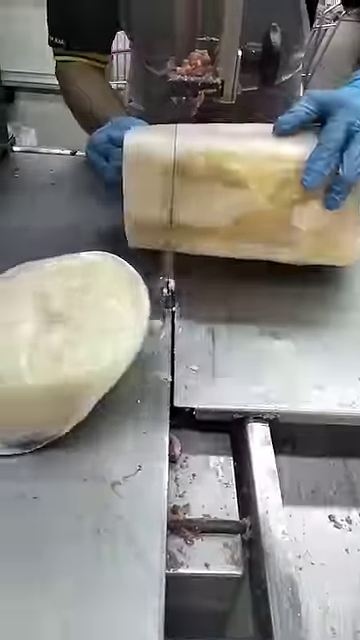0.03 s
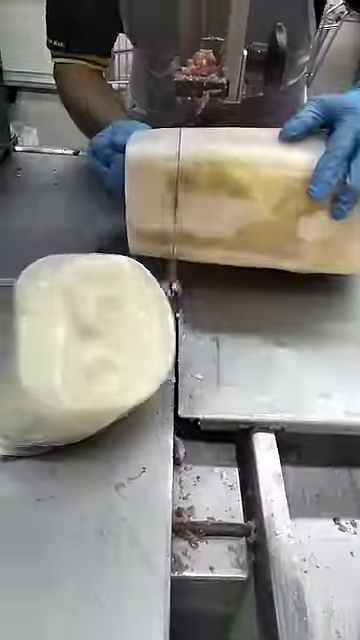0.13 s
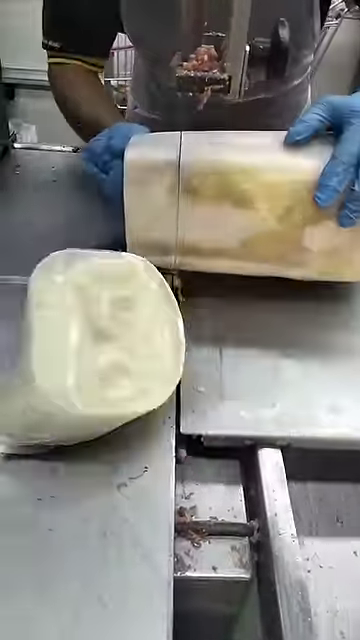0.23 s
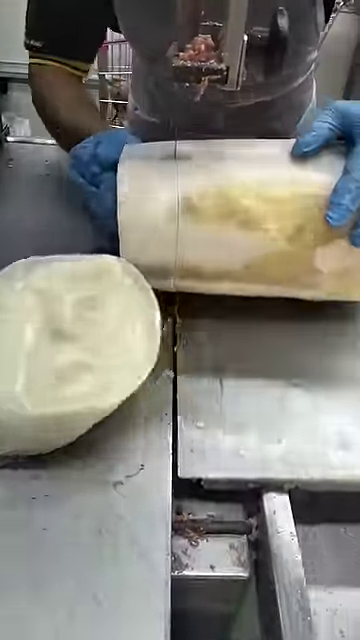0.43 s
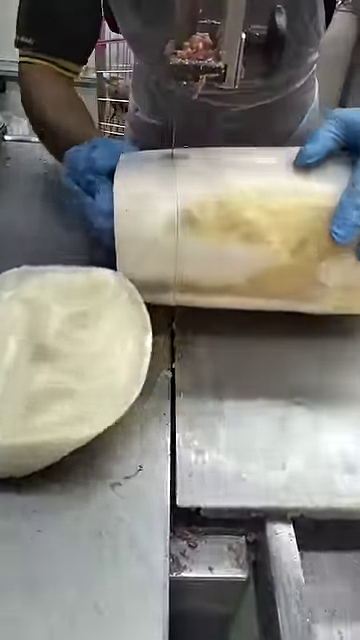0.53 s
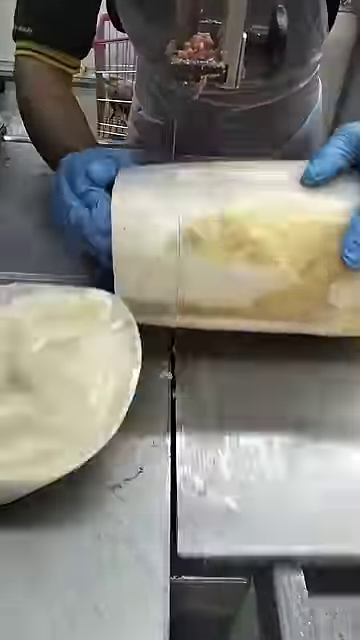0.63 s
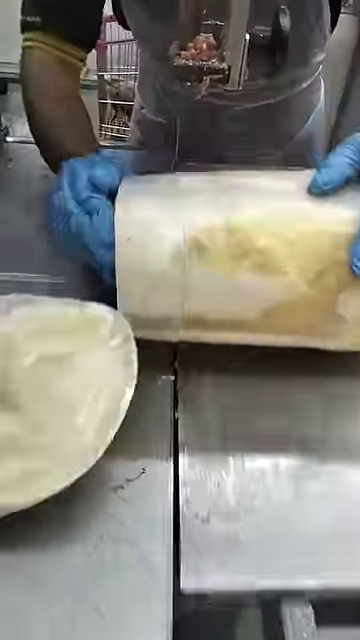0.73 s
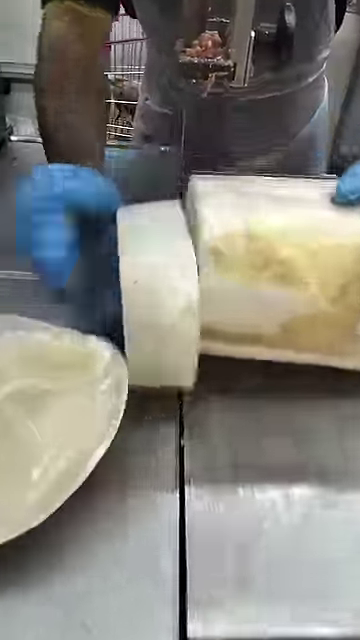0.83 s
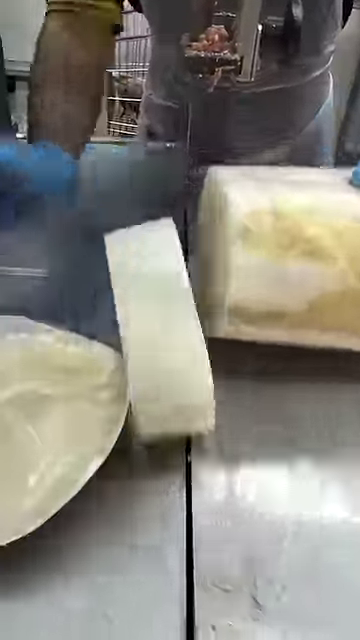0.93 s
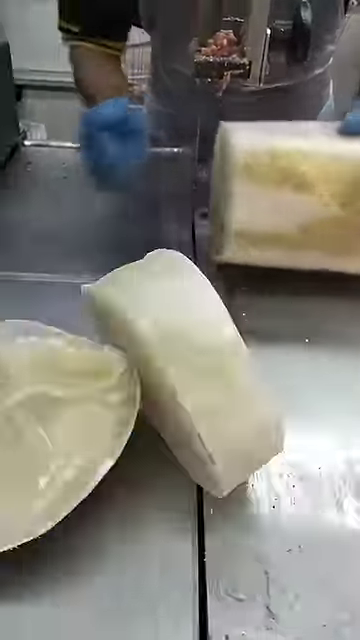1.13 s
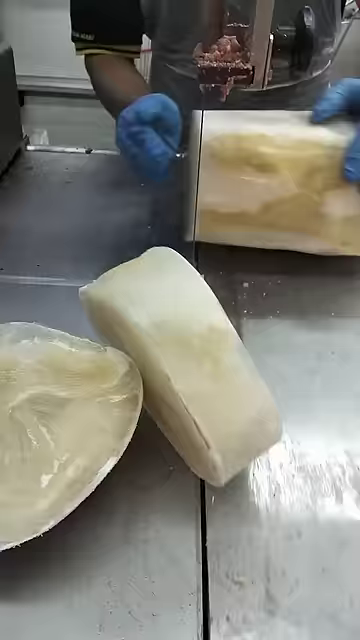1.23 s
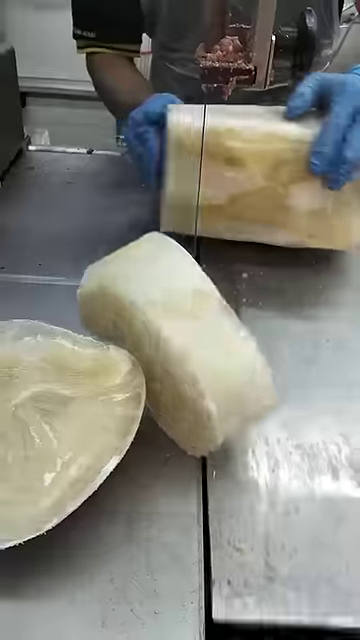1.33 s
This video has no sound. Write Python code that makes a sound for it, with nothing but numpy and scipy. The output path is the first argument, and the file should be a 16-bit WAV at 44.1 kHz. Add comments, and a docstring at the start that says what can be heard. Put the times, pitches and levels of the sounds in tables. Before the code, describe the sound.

A band saw cuts a frozen block with a harsh, rasping squeal over machine hum.

```python
"""A band saw hums and whines in a workshop; then a frozen block is pushed through it near the microphone.
Tiny fractures at the teeth make a hiss and a rasp, and the blade, in forced vibration, buzzes and
squeals on harmonics of the tooth rate. The ice cracks and flung chips pelt the microphone.
The slice comes free and nudges the steel table while the blade whines on over the motor."""
import sys
import numpy as np
from scipy import signal
from scipy.fft import rfft, irfft, next_fast_len
from scipy.io import wavfile

SR = 44100
rng = np.random.default_rng(int(sys.argv[2]) if len(sys.argv) > 2 else 0)


def log_audio(samples):
    """Write samples as a 16-bit WAV file to the path given in sys.argv[1]."""
    # one column per channel
    frames = np.atleast_2d(samples).T
    # limit to full scale, then quantise
    limited = np.clip(frames, -1, 1)
    pcm = np.round(limited * 32767).astype(np.int16)
    wavfile.write(sys.argv[1], SR, pcm)


N = 61739
TIME = np.arange(N) / SR


def undb(db):
    """Decibels to amplitude ratio."""
    return 10 ** (np.asarray(db) / 20)


def unit(x):
    """Normalisation to rms 1."""
    return x / np.sqrt(np.mean(x ** 2))


def curve(rows):
    """Linear interpolation of (time [s], value) points."""
    return np.interp(TIME, *np.array(rows).T)


def swell(rows, fade_s=0.025):
    """Amplitude envelope through (time [s], level [dB]) points, fading out beyond both ends."""
    inside_s = np.minimum(TIME - rows[0][0], rows[-1][0] - TIME)
    return undb(curve(rows)) * np.clip(1 + inside_s / fade_s, 0, 1) ** 2


def wander(hz):
    """Random fluctuation: noise of rms 1, low-passed at hz."""
    f = np.arange(N // 2 + 1) * SR / N
    return unit(irfft(rfft(rng.standard_normal(N)) / (1 + (f / hz) ** 2), N))


def colour(x, spectrum):
    """Minimum-phase filtering through (frequency [Hz], level [dB]) points, scaled to rms 1."""
    size = 2 * next_fast_len(N)
    hz, db = np.array(spectrum).T
    f = np.arange(size // 2 + 1) * SR / size
    gain = undb(np.interp(np.log(f + 1), np.log(hz), db))
    cepstrum = irfft(np.log(gain))
    cepstrum[1:size // 2] *= 2
    cepstrum[size // 2 + 1:] = 0
    return unit(irfft(rfft(x, size) * np.exp(rfft(cepstrum)))[:N])


def clicks(per_s, spread_db):
    """Shot noise: independent impulses of uneven size."""
    struck = rng.random(N) < per_s / SR
    size = undb(spread_db * np.clip(rng.standard_normal(N), -2, 2))
    return struck * size * np.sign(rng.standard_normal(N))


def wavering_phase(hz, jitter, jitter_hz):
    """Frequency modulation: the phase of a rate that wavers by the rms fraction jitter."""
    return 2 * np.pi * np.cumsum(hz * (1 + jitter * wander(jitter_hz))) / SR


def rough_line(phase, width_hz):
    """Narrow-band noise: a partial of random amplitude and phase."""
    return wander(width_hz) * np.cos(phase) + wander(width_hz) * np.sin(phase)


def rough_tone(phase, partials, width_hz):
    """Superposition of noise bands on the harmonics of one rate, at rms 1."""
    return unit(sum(undb(db) * rough_line(k * phase, width_hz) for k, db in partials))


def locked_tone(phase, partials, flutter_db=1.3):
    """Phase-locked harmonics at rms 1; flutter grows with the root of the harmonic number."""
    tone = 0
    for k, db in partials:
        gain = undb(db + flutter_db * np.sqrt(k) * wander(65))
        tone += gain * np.sin(k * phase + 2 * np.pi * rng.random())
    return unit(tone)


# Motor tones (frequency [Hz], level [dB])
HUM_TONES = [(97, -51), (140, -51), (183, -52), (237, -52), (1168, -84), (1367, -60)]
# Machine rumble (frequency [Hz], relative spectral density [dB])
RUMBLE_SPECTRUM = [(20, -30), (50, 2), (80, -3), (150, -5.5), (210, -9.5), (280, -3.5), (420, -15.5),
                   (1300, -22.5), (4000, -18.5), (15000, -48)]
def motor():
    """Machine vibration: a line spectrum of hum over a continuous spectrum of rumble."""
    hum = sum(undb(db) * rough_line(2 * np.pi * hz * TIME, width_hz=6.3) for hz, db in HUM_TONES)
    return hum + undb(-45) * colour(rng.standard_normal(N), RUMBLE_SPECTRUM)


# Partials of the free blade (harmonic number, relative level [dB])
WHINE_PARTIALS = [(1, -11.5), (2, 0.5), (3, -5.5), (4, -3), (5, -11), (6, -7), (7, -14), (9, -14),
                  (10, -13), (12, -10.5), (14, -11)]
# The whine swells as the block comes near (time [s], relative level [dB])
WHINE_ENVELOPE = [(0, 1.5), (.16, 10.5), (.24, 4), (.8, -5), (.92, -5.5), (1.1, -1), (1.4, -18)]
def whine(tooth_hz=958.6, width_hz=6.5):
    """Periodic excitation: the free blade sounds harmonics of its tooth rate."""
    phase = wavering_phase(tooth_hz, jitter=0.0018, jitter_hz=6.5)
    tone = unit(sum(undb(db) * rough_line(k * phase, width_hz * k) for k, db in WHINE_PARTIALS))
    return undb(-46.5 + curve(WHINE_ENVELOPE)) * tone


# Friction in the guides (frequency [Hz], relative spectral density [dB])
GUIDE_SPECTRUM = [(350, -6.5), (550, -3), (750, -3.5), (1300, -1), (1800, -3.5), (2080, -8.5), (2450, -2.5),
                  (3050, -10), (3450, -9), (4150, 0), (4450, -4), (5100, -17.5), (5900, -8), (7400, -19),
                  (8600, -12), (9400, -14), (10000, -21), (10900, -21), (11600, -17.5), (13300, -16),
                  (14000, -21), (15200, -18.5)]
# Its strength (time [s], relative level [dB])
GUIDE_ENVELOPE = [(0, 2), (.15, 2), (.22, 7), (.8, -5.5), (.92, -2.5), (1.1, -4), (1.33, -1), (1.39, 2)]
def guides():
    """Sliding friction: the blade rubs its guides and makes fluctuating broadband noise."""
    friction = rng.standard_normal(N) * undb(0.99 * wander(35))
    return undb(-41.5 + curve(GUIDE_ENVELOPE)) * colour(friction, GUIDE_SPECTRUM)


# Teeth shaving ice (frequency [Hz], relative spectral density [dB])
HISS_SPECTRUM = [(300, -13), (1000, -4.5), (3200, -6.5), (4200, 4), (5400, -4), (7500, 0.5), (9000, 2),
                 (9900, -3), (10600, -7.5), (11300, -3.5), (12200, 2), (13500, -2), (15200, 0.5)]
# Strength of the hiss (time [s], level [dB])
HISS_ENVELOPE = [(0, -54), (.1, -44), (.16, -41), (.17, -32), (.195, -32.5), (.218, -24.5), (.34, -23.5),
                 (.385, -30.5), (.48, -27), (.55, -23.5), (.72, -29), (.78, -28), (.82, -33), (.88, -34.5),
                 (.92, -48.5), (1.05, -70)]
def hiss(bite):
    """Brittle fracture: tiny breaks at the teeth merge into bright shot noise."""
    fractures = bite * clicks(per_s=18000, spread_db=2.5)
    return colour(fractures, HISS_SPECTRUM) * swell(HISS_ENVELOPE)


# Partials of the buzz (harmonic number, relative level [dB])
BUZZ_PARTIALS = [(1, -14.5), (2, -7.5), (3, -6.5), (4, 2.5), (5, -10), (6, -2), (7, -5.5), (8, -7), (9, -8),
                 (10, -9.5), (12, -10.5), (15, -10)]
# Strength of the buzz (time [s], level [dB])
BUZZ_ENVELOPE = [(.185, -74), (0.208, -24.5), (.27, -26.5), (.32, -30), (.36, -24), (.42, -29), (.6, -28.5),
                 (.7, -25.5), (.77, -37.5), (.83, -34), (0.868, -46), (.95, -51.5)]
def buzz(tooth_hz):
    """Forced vibration: the teeth drive the loaded blade in rough harmonics."""
    phase = wavering_phase(tooth_hz, jitter=0.00321, jitter_hz=38.3)
    return rough_tone(phase, BUZZ_PARTIALS, width_hz=41) * swell(BUZZ_ENVELOPE)


# Teeth deep in the block (frequency [Hz], relative spectral density [dB])
RASP_SPECTRUM = [(400, -19), (850, -17), (1150, -1.5), (1550, 1.5), (1730, 8.5), (1860, -3.5), (2200, -5),
                 (2480, 4.5), (2900, -1.5), (3250, -5.5), (3650, 4.5), (4400, 1), (5400, -4.5),
                 (6800, -13.5), (9000, -14.5), (10600, -18), (15000, -23)]
# Strength of the rasp (time [s], level [dB])
RASP_ENVELOPE = [(.2, -39), (.31, -53), (.375, -24), (.46, -23), (.485, -34), (.515, -24), (.56, -40),
                 (.62, -23), (.645, -32), (.68, -18), (.725, -30), (.765, -37), (.795, -52), (.9, -41.5)]
# Chatter of the blade as it sinks in (time [s], modulation depth [0-1])
CHATTER_ENVELOPE = [(.35, 0.16), (.378, 1), (.42, 1), (.5, 0.17), (.75, 0.25)]
def rasp(bite, chatter_hz=377.7):
    """Amplitude modulation: blade chatter pulses the fractures deep in the cut."""
    phase = wavering_phase(chatter_hz, jitter=0.1566, jitter_hz=156)
    chatter = 1 + curve(CHATTER_ENVELOPE) * np.cos(phase)
    fractures = bite * chatter * clicks(per_s=4000, spread_db=0.5)
    return colour(fractures, RASP_SPECTRUM) * swell(RASP_ENVELOPE)


# Partials of the high and the low squeal (harmonic number, relative level [dB])
HIGH_SQUEAL_PARTIALS = [(4, -10), (8, -23.5)]
LOW_SQUEAL_PARTIALS = [(2, -4.5), (6, -9)]
# Strength of each squeal (time [s], level [dB])
HIGH_SQUEAL_ENVELOPE = [(.2, -52), (.26, -25), (.335, -42), (0.369, -17), (.41, -33), (.488, -30),
                        (.503, -17.5), (.525, -15), (.56, -27.5), (0.591, -31), (0.613, -16.5), (.64, -50),
                        (.69, -20.5), (.74, -51), (0.786, -49), (.818, -34.5), (.85, -57), (0.921, -76)]
LOW_SQUEAL_ENVELOPE = [(.25, -50), (.35, -37.5), (0.396, -22.5), (.44, -26.5), (.515, -27), (.535, -44)]
def squeal(tooth_phase):
    """Lock-in: the blade follows the fourth tooth harmonic and, early in the cut, the second too."""
    high = locked_tone(tooth_phase, HIGH_SQUEAL_PARTIALS) * swell(HIGH_SQUEAL_ENVELOPE)
    low = locked_tone(tooth_phase, LOW_SQUEAL_PARTIALS) * swell(LOW_SQUEAL_ENVELOPE)
    return high + low


# Partials at first touch (harmonic number, relative level [dB])
GRAZE_PARTIALS = [(1, -4), (5, 4.5), (7, -5)]
# Their strength (time [s], level [dB])
GRAZE_ENVELOPE = [(.205, -38), (.26, -31.5), (.285, -38.5)]
def graze(tooth_phase):
    """Periodic contact: the blade sings as its teeth skim the surface."""
    return locked_tone(tooth_phase, GRAZE_PARTIALS) * swell(GRAZE_ENVELOPE)


# Strikes of large chips (time [s], level [dB], frequency [Hz])
CHIP_STRIKES = [(0.2167, -3.5, 120), (0.2236, -15, 44), (0.2773, -16.5, 46.6), (0.2908, -12.5, 70.6),
                (0.2969, -9.5, 64.3), (.31, -37, 71), (0.338, -14, 59.4), (0.3488, -6.5, 390),
                (0.364, -13.5, 228), (.467, -7.5, 116), (0.4988, -11.5, 198), (.501, -2, 790),
                (0.521, -13, 209), (.529, 2, 470), (.552, -1, 148), (.559, -16, 120), (.574, -8.5, 200),
                (0.593, -3, 109), (.613, -1.5, 200), (.624, -6, 179), (0.656, -5, 129), (.704, -8, 450),
                (.729, -6, 353), (0.743, -5, 151), (.757, -5, 300), (.768, -7, 387)]
def thuds(rise_s=0.00011, decay_cycles=0.46):
    """Heavily damped oscillation: each large chip strikes the microphone with a dull thud."""
    out = 0
    for start, db, hz in CHIP_STRIKES:
        age = np.maximum(TIME - start, 0)
        envelope = (1 - np.exp(-age / rise_s)) * np.exp(-age * hz / decay_cycles)
        out += undb(db) * envelope * np.cos(2 * np.pi * hz * age)
    return out


# Sharp cracks in the ice (time [s], relative level [dB])
ICE_CRACKS = [(.273, -16), (.3773, -21), (0.381, -25), (0.3827, -19), (0.4093, -20), (.412, -7),
              (0.4966, -5), (.501, -12), (0.6635, -12), (.759, -13)]
def cracks(t60_s=0.0025, band_hz=(895, 5840)):
    """Impulsive fracture: bigger pieces snap off in short, and therefore broadband, bursts."""
    bursts = sum((TIME >= start) * undb(db - 60 * np.abs(TIME - start) / t60_s)
                 for start, db in ICE_CRACKS)
    band = signal.butter(1, band_hz, "band", fs=SR, output="sos")
    return signal.sosfilt(band, 2 * bursts * np.sign(rng.standard_normal(N)))


# Coarse and fine chips (frequency [Hz], relative spectral density [dB])
COARSE_SPECTRUM = [(15, -7.5), (32, 5), (60, -3.5), (120, 0), (220, -8.5), (450, -14.5), (1000, -17),
                   (3000, -38), (15000, -58)]
FINE_SPECTRUM = [(30, -15), (150, 2), (400, 3.5), (700, -2), (1100, 0.5), (1600, -5.5), (2400, -10),
                 (4500, -11.5), (15000, -50)]
# Strength of each spray (time [s], level [dB])
COARSE_ENVELOPE = [(.275, -23), (.3, -29), (.36, -33.5), (.41, -48), (.445, -29.5), (.475, -22),
                   (.49, -32.5), (.51, -11.5), (.575, -18), (.65, -19), (.7, -27.5), (.765, -18.5),
                   (.79, -31), (.84, -62)]
FINE_ENVELOPE = [(.47, -59), (.492, -59), (.5, -11.5), (.53, -19), (.575, -24.5), (.61, -18), (.645, -19),
                 (.67, -17), (.715, -17), (.765, -18.5), (.79, -39), (.83, -86)]
def spray():
    """Shot noise: flung chips pelt the microphone at random instants."""
    coarse = colour(clicks(per_s=600, spread_db=3), COARSE_SPECTRUM) * swell(COARSE_ENVELOPE)
    fine = colour(clicks(per_s=970, spread_db=3.5), FINE_SPECTRUM) * swell(FINE_ENVELOPE)
    return coarse + fine


# Partials of the screech (harmonic number, relative level [dB])
SCREECH_PARTIALS = [(3, -3), (4, -3.5), (5, 0), (6, 2.5), (7, 0.5), (8, -6.5), (9, -5)]
# Its two flares (time [s], level [dB])
SCREECH_ENVELOPE = [(.28, -57), (.325, -31.5), (0.353, -19), (.385, -42), (.425, -31), (.458, -24),
                    (.49, -30), (.56, -60)]
def screech(fundamental_hz=967):
    """Line broadening: wide partials make the blade sound harsh, slightly flat of the squeal."""
    phase = wavering_phase(fundamental_hz, jitter=0.00321, jitter_hz=41)
    return rough_tone(phase, SCREECH_PARTIALS, width_hz=180) * swell(SCREECH_ENVELOPE)


# The loose slice nudges the table (time [s], level [dB], frequency [Hz])
SLICE_NUDGES = [(0.899, -35, 139.6), (1.144, -38.5, 167), (1.371, -34.5, 145)]
def steel_table(rise_s=0.005, t60_s=0.73):
    """Free vibration: the table booms softly and dies away after each nudge."""
    out = 0
    for start, db, hz in SLICE_NUDGES:
        age = np.maximum(TIME - start, 0)
        envelope = (1 - np.exp(-age / rise_s)) * undb(db - 60 * age / t60_s)
        out += envelope * np.sin(2 * np.pi * hz * age)
    return out


# Tooth rate under load (time [s], frequency [Hz])
TOOTH_RATE = [(.19, 1011), (.245, 999), (.3, 1014), (.38, 1005), (.52, 1009), (.62, 1006), (.72, 1005),
              (.84, 990)]
def cut(bite_depth=0.23):
    """Common excitation: the passing teeth both modulate the fractures and drive the blade."""
    tooth_hz = curve(TOOTH_RATE)
    phase = wavering_phase(tooth_hz, jitter=0.0018, jitter_hz=90)
    bite = (1 + bite_depth * np.cos(phase)) * undb(0.69 * wander(120))
    return hiss(bite) + buzz(tooth_hz) + rasp(bite) + squeal(phase) + graze(phase) + screech()


def workshop(direct, t60_s=0.12, reverb_db=-11.5):
    """Reverberation: reflections from hard walls and steel tables form a short exponential tail."""
    tail = rng.standard_normal(N) * undb(-60 * TIME / t60_s)
    tail /= np.sqrt(np.sum(tail ** 2))
    return direct + undb(reverb_db) * signal.fftconvolve(direct, tail)[:N]


def scene():
    """Superposition: the machine, the cut in its room, chips on the microphone and the table."""
    machine = motor() + whine() + guides()
    return (machine + workshop(cut() + cracks()) + thuds() + spray() + steel_table())[None, :]


def record(dry, bottom_hz=16, top_hz=15500):
    """Band limiting and saturation: the deepest bass and the top are cut, and peaks are rounded."""
    x = signal.sosfilt(signal.butter(2, bottom_hz, "high", fs=SR, output="sos"), dry)
    rounded = x / (1 + x ** 4) ** .25
    return signal.sosfilt(signal.ellip(14, .1, 90, top_hz, fs=SR, output="sos"), rounded)


dry = scene()
out = record(dry)
log_audio(out)
```